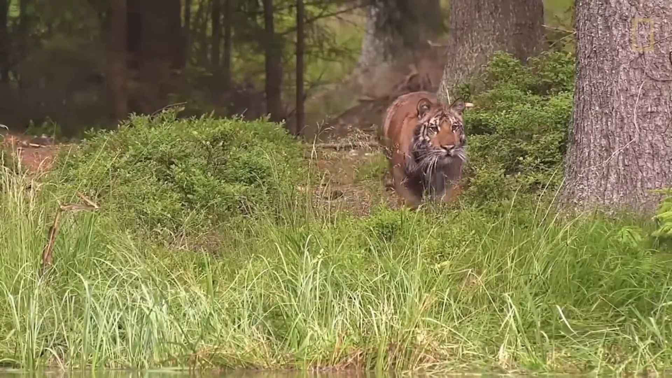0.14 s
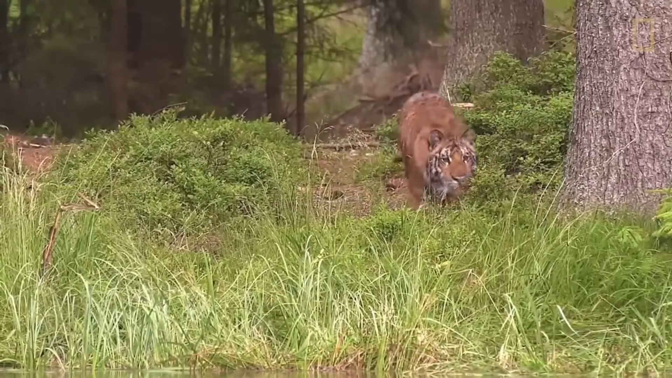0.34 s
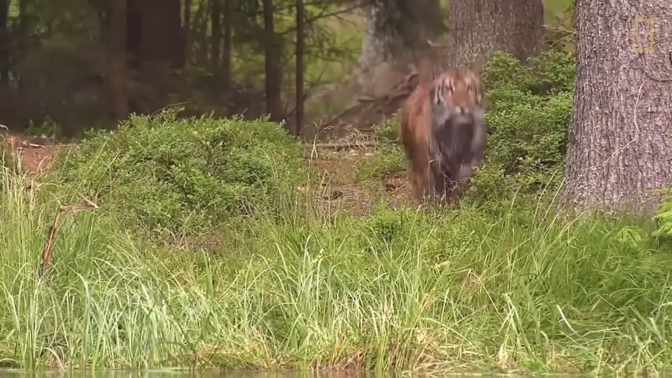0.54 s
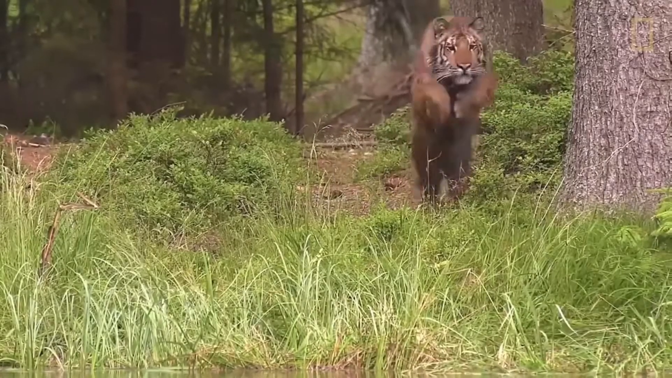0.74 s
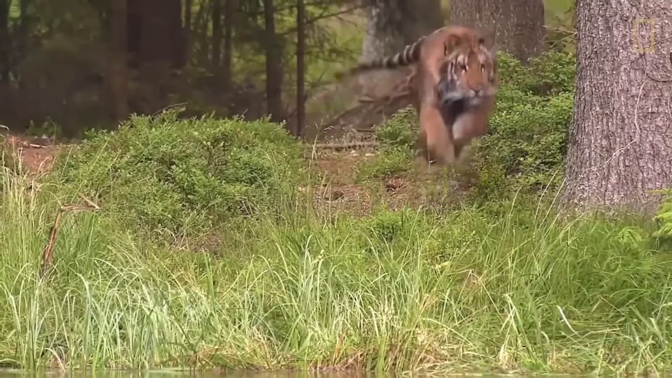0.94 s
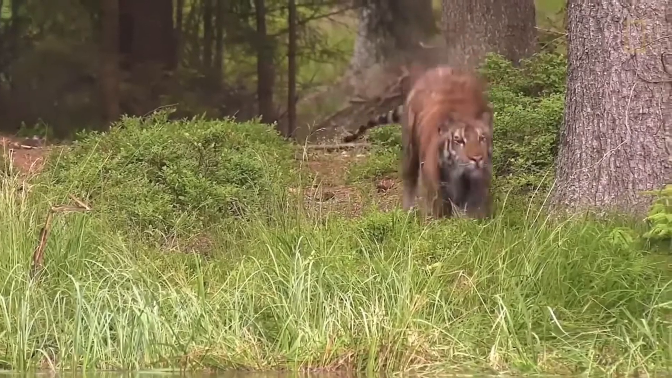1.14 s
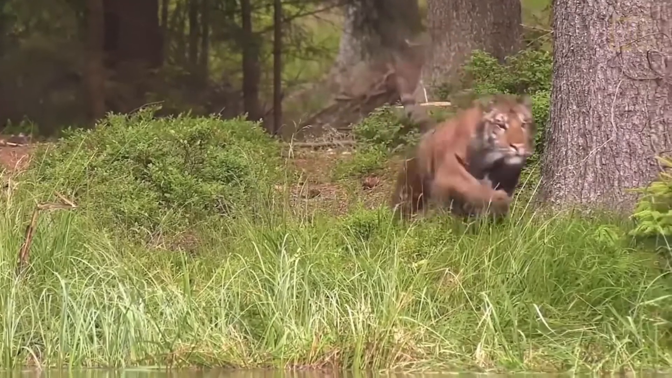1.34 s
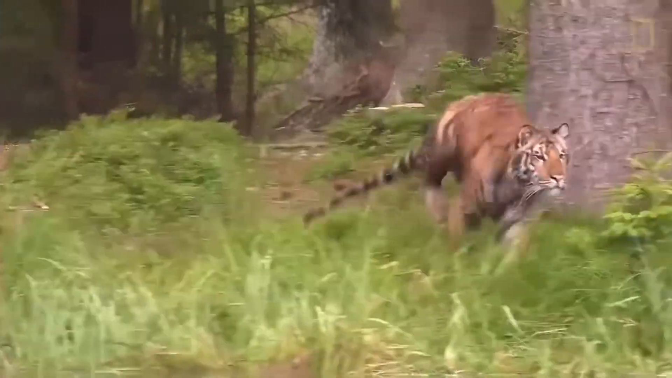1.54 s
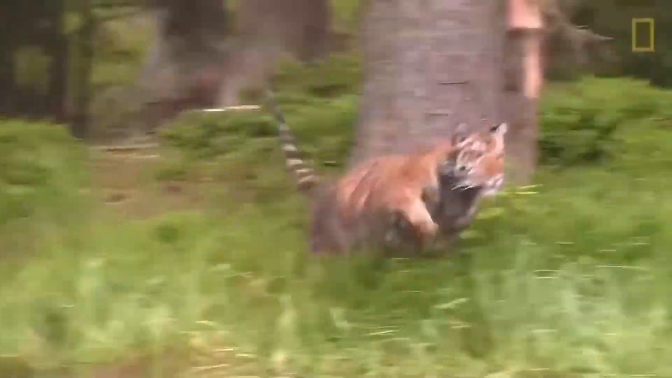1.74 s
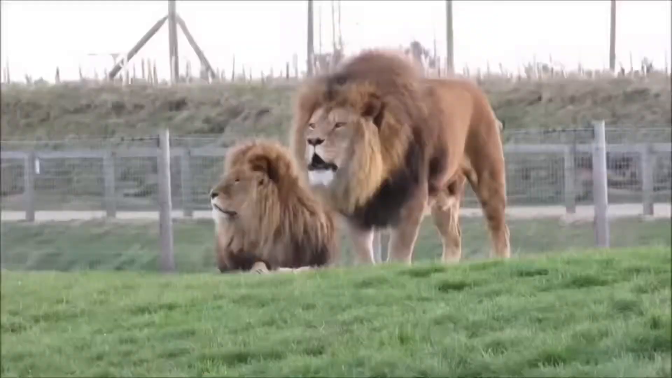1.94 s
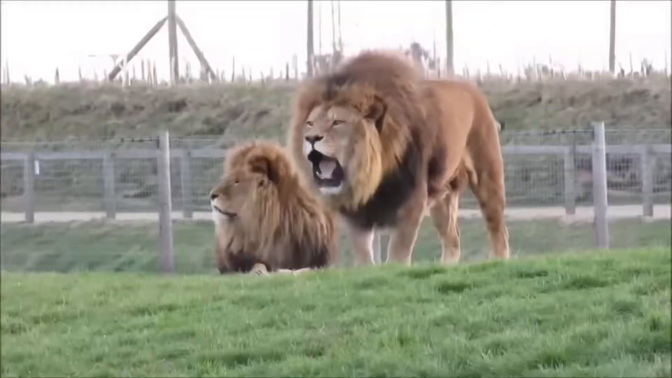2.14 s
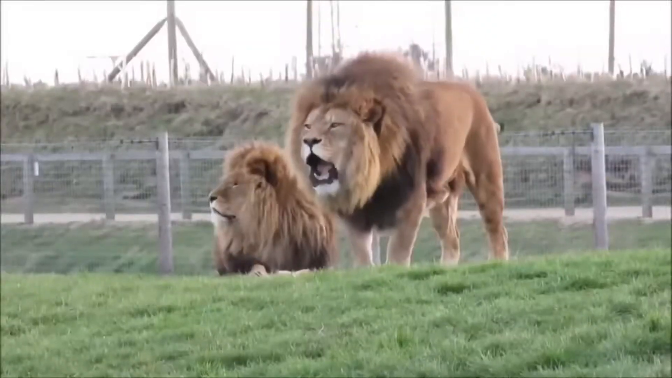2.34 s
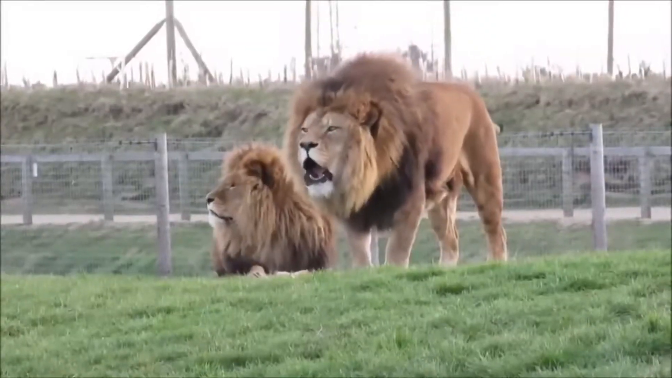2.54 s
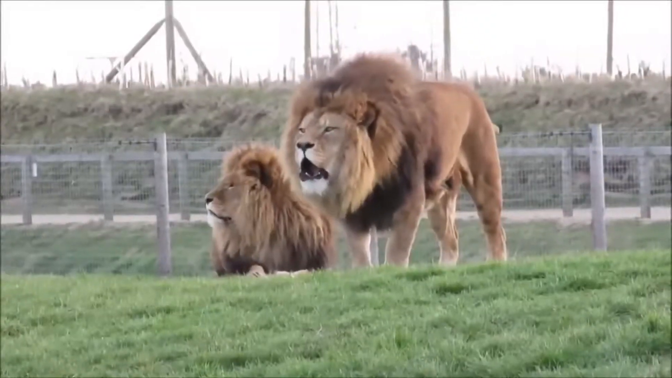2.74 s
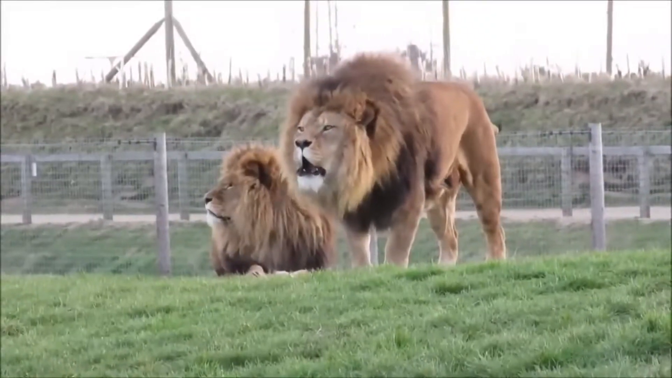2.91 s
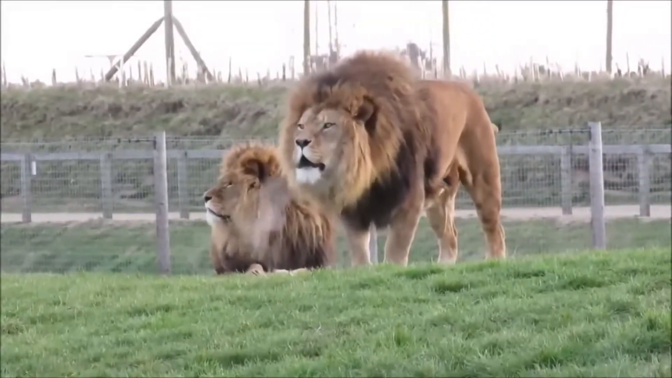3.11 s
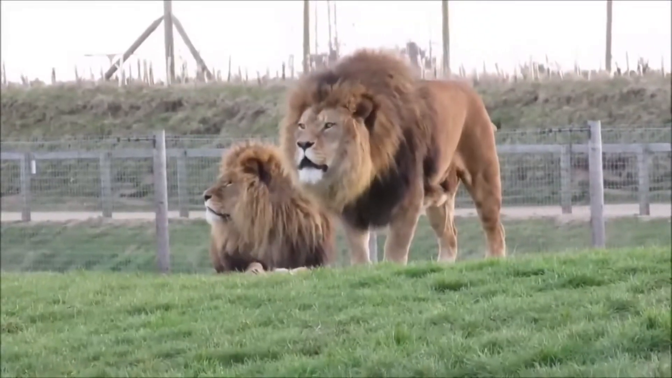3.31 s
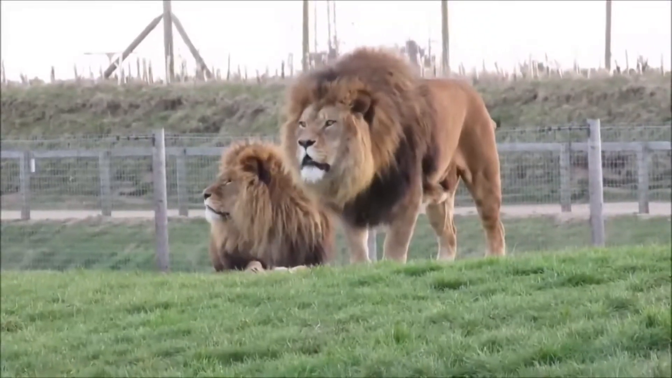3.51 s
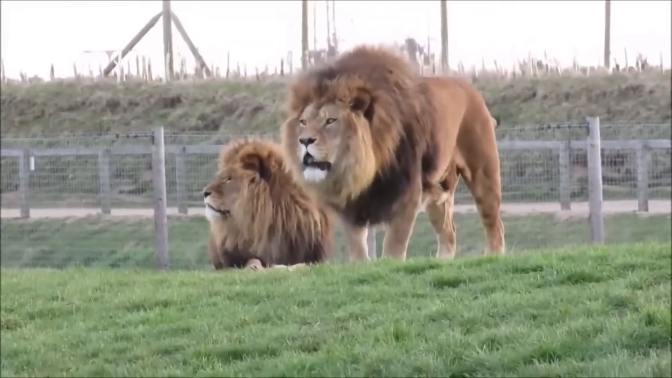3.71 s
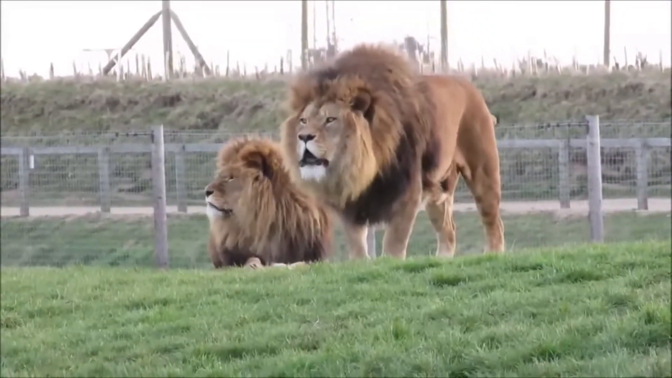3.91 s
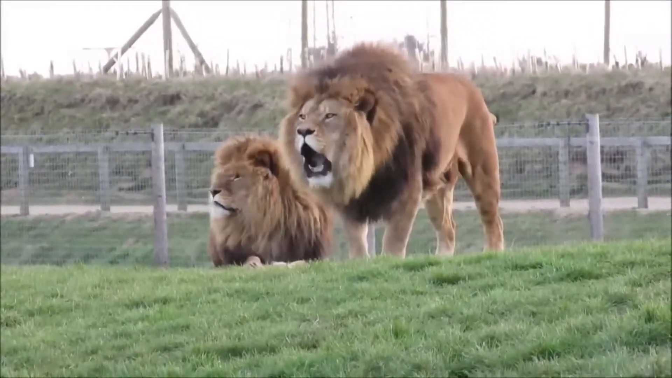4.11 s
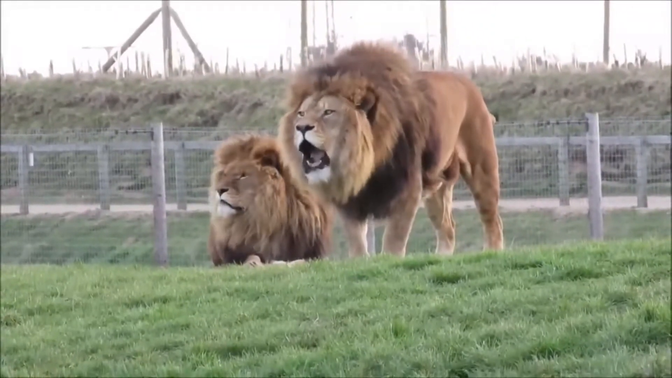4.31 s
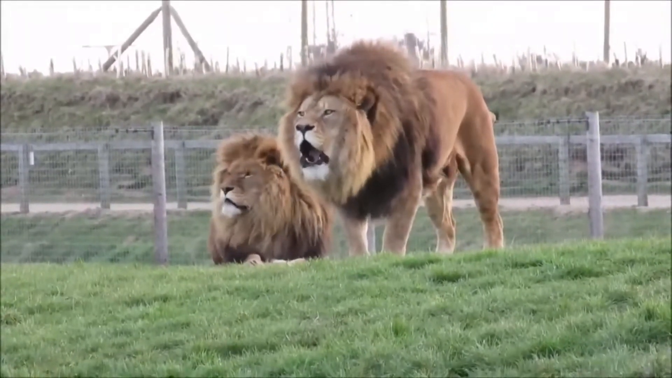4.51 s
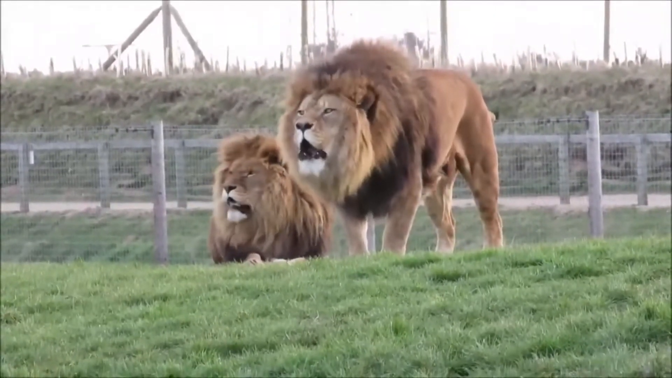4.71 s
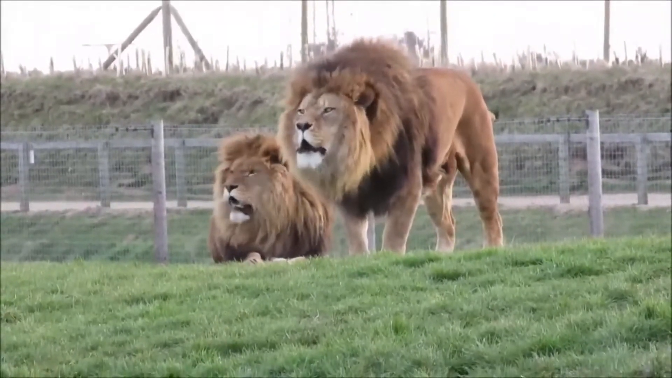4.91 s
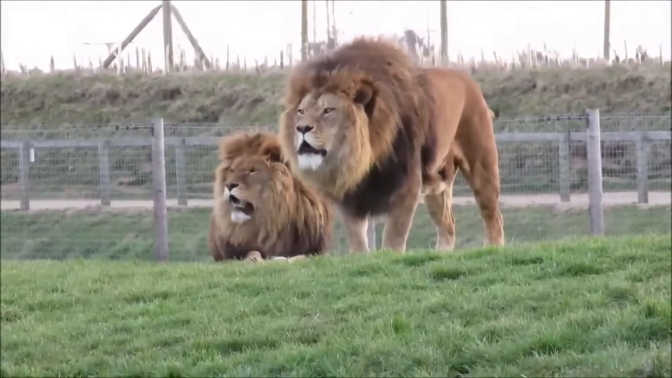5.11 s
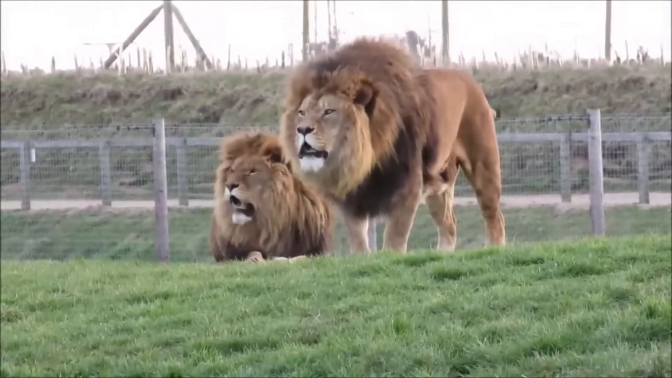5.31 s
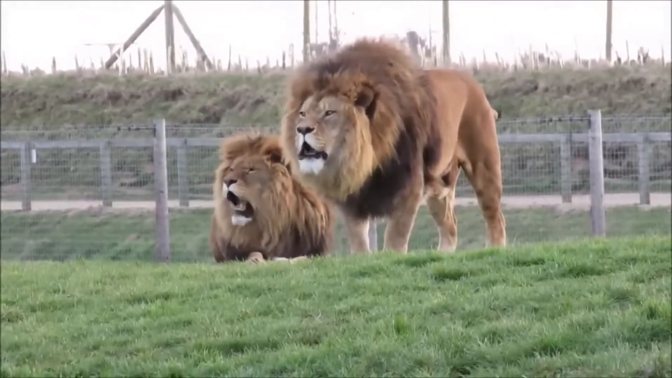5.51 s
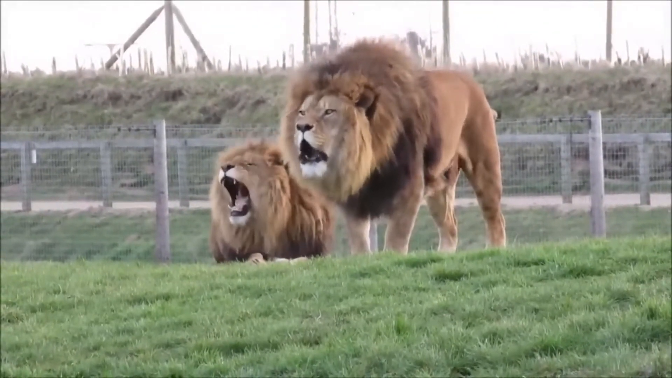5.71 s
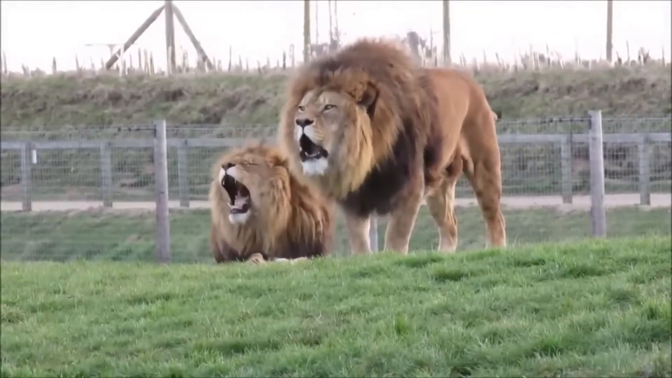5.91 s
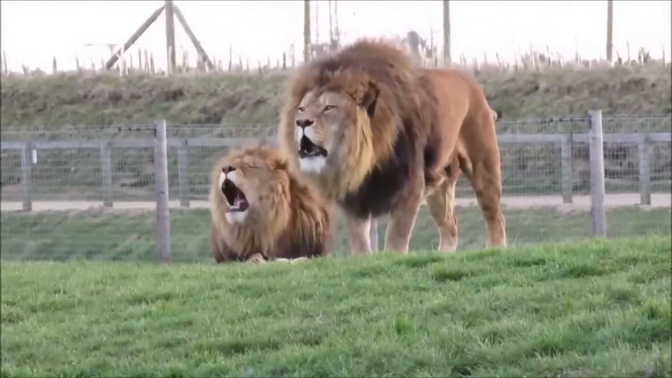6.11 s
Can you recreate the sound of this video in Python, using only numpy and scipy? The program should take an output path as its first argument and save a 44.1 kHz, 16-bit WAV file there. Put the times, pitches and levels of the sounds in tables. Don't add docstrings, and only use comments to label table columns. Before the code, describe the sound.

An open paddock with low, steady distant traffic hum and slight echoes from banks and fences. At 0 s a male lion close ahead is already roaring: hoarse, pulsing, climbing in pitch, with a small wheeze, rasping air and wet ticks, breaking at 0.8 s into a sagging grunt until about 1 s, then a faint pant. From 1 to 1.6 s soft low wind puffs hit the microphone and a faraway bird whistles gliding notes around 1.2-1.4 s. The second roar swells from 2.2 to 3.1 s, then grunts to 3.4 s. A second lion off to one side moans, throbbing most clearly at 3.3-4 s, and coughs until 4.25 s. The third, harsher roar runs 4.3-5 s with a grunt to 5.2 s and a pant. From 5.2 to 5.9 s wind flaps and rumbles in heavy low knocks. A strained fourth roar starts at 5.93 s and is cut off.

```python
import sys
import numpy as np
from scipy import signal
from scipy.fft import rfft, irfft
from scipy.io import wavfile
from scipy.ndimage import uniform_filter1d

SR = 44100
rng = np.random.default_rng(int(sys.argv[2]) if len(sys.argv) > 2 else 0)


def boost(x):
    u = np.asarray(x, float) / 20
    return 10 ** u


def generate_wav(sig):
    pcm = np.round(np.clip(np.atleast_2d(sig).T, -1, 1) * 32767).astype(np.int16)
    wavfile.write(sys.argv[1], SR, pcm)


N = 271215


def evened(x):
    return x / np.sqrt(np.mean(x ** 2) + 1e-20)


def steadied(x, size=3000):
    return x / np.sqrt(abs(uniform_filter1d(x ** 2, size)) + 1e-12)


def read(points, hz):
    f, value = np.transpose(points)
    return np.interp(np.log(hz + 1), np.log(f + 1), value)


def curve(rows, swing=1.0, pivot_db=-46.5):
    s, db = np.transpose(rows)
    return boost(np.interp(np.arange(N) / SR, s, pivot_db + swing * (db - pivot_db), -120, -120))


def timeline(rows):
    s, *columns = np.transpose(rows)
    t = np.linspace(s[0], s[-1], num=200)
    return t, *(np.interp(t, s, c) for c in columns)


def step(t, at, width=.06):
    return np.clip((t - at) / width + .5, 0, 1)


def add(mix, s, sound):
    part = mix[round(s * SR):][:len(sound)]
    part += sound[:len(part)]


def drift(count, hz):
    return evened(signal.lfilter(*signal.butter(2, hz, fs=SR), rng.standard_normal(count)))


def tone(hz):
    return np.sqrt(2) * np.sin(2 * np.pi * np.cumsum(hz) / SR)


def coloured(x, points):
    gain = boost(read(points, np.fft.rfftfreq(x.shape[-1], 1 / SR)))
    return evened(irfft(rfft(x) * gain, x.shape[-1]))


def resonate(x, hz, width):
    turn = np.exp(2j * np.pi * np.cumsum(hz * np.ones(len(x))) / SR)
    r = np.exp(-np.pi * width / SR)
    smooth = signal.lfilter([(1 - r) ** 2], np.convolve([1, -r], [1, -r]), x * turn.conj())
    return 2 * (turn * smooth).real


def ring(db, hz, cycles):
    u = np.arange(5000) / SR * hz / cycles
    return boost(db) * np.e * 2 * u * np.exp(-2 * u) * np.sin(2 * np.pi * u * cycles)


def patchwork(x, size_hz, size_s):
    return evened(uniform_filter1d(uniform_filter1d(x, size_hz, axis=0), size_s, axis=1))


# (starting chest resonance [Hz], fraying starts [s], fraying ends [s],
# strain [dB], grunt length [s], fraying [0-1], extra gape [0-1])
ROARS = [
    (290.3, 0.28, 0.5, 0.5, .205, .5, -.15),
    (289, 2.39, 2.8, 0.5, 0.32, .38, -0.2),
    (259.5, 4.34, 4.49, 2.5, .23, .42, 0.17),
    (198, 5.9, 6.16, 3.5, 0.28, .4, -.15),
]
# (time [s], pitch [Hz], effort [dB], mouth over chest [dB])
FIRST = [(0, 128.4, -36.5, 1.5), (0.11, 150.8, -23.5, -5), (.17, 138.4, -26.5, -6),
         (0.299, 142.1, -19.5, -5.5), (0.336, 164.3, -21, -2), (0.437, 175, -28, 6),
         (0.462, 160.2, -24.5, -4), (.51, 164.9, -24, -1), (0.534, 182.1, -29.5, 5),
         (0.709, 193.7, -17.5, -13), (.825, 196.6, -24, 3)]
SECOND = [(2.2, 140.9, -68, 11.5), (2.279, 145.1, -33.5, 4), (2.392, 164, -25, 0), (2.569, 165.9, -22, -6),
          (2.669, 181.1, -25, -1.5), (2.772, 186.2, -31.5, 6.5), (2.894, 196, -15.5, -16),
          (3.001, 193.4, -21, -4.5), (3.085, 195.8, -25.5, 1.5)]
THIRD = [(4.28, 188.6, -42, -1.5), (4.358, 194.2, -31, 6), (4.45, 191.4, -24.5, -2),
         (4.51, 171.9, -20.5, -5), (4.57, 176.8, -27, -1), (4.681, 186.2, -25.5, -1.5),
         (4.792, 193.4, -16, -16.5), (4.9, 192.8, -22.5, -2), (4.965, 185, -25, 3.5)]
FOURTH = [(5.93, 167, -50, -25), (5.954, 163.8, -38, 8.5), (6.018, 172.5, -30.5, 2.5), (6.15, 183, -34, 4),
          (6.7, 188, -37, 9)]


def roars():
    out = np.zeros(N)
    for rows, habits in zip((FIRST, SECOND, THIRD, FOURTH), ROARS):
        add(out, *roar(rows, *habits))
        strain_db, length = habits[3], habits[4]
        if rows[-1][0] < N / SR:
            add(out, *grunt(rows[-1][0], length, strain_db))
    return out


# (time from the break [s], larynx drop [0-1], gape [0-1])
DESCENT = [(-.6, 0.03, 0.31), (-.42, 0.1, 0.38), (-.3, 0.35, .65), (-.2, 1, 0.83), (-.1, .97, 0.59),
           (0, 0.95, 0.11)]
LOW_CHEST_HZ = 204.4
SMOOTH, TIRED, TIRE_S = .11, .31, .1
EVEN, UNEVEN, SPENT = .07, .75, .3
WEAR_S, EXHALE_S = 0.66, 0.19


def roar(rows, chest_hz, fray_from, fray_to, strain_db, length, fraying, extra_gape):
    t, hz, effort_db, open_db = timeline(rows)
    before, drop, gape = np.transpose(DESCENT)
    left = (t - t[-1]) * (0.16 / length) ** 0.5
    drop = np.interp(left, before, drop)
    gape = np.interp(left, before, gape) + extra_gape * (1 - step(t, fray_to))
    frayed = step(t, fray_from) - step(t, fray_to)
    tired = step(t, t[-1] - TIRE_S)
    rough = SMOOTH + (fraying - SMOOTH) * frayed + (TIRED - SMOOTH) * tired
    beating = step(t, (fray_from + fray_to) / 2, fray_to - fray_from + 0.022)
    alternate = EVEN + (UNEVEN - EVEN) * beating - (UNEVEN - SPENT) * tired
    chest_hz = chest_hz + (LOW_CHEST_HZ - chest_hz) * drop
    age = np.minimum(t - t[0], WEAR_S)
    return near_breath(t, hz, effort_db, open_db, chest_hz, gape, rough, alternate, strain_db, age)


# (share of its length [0-1], pitch [Hz], effort [dB], mouth over chest [dB])
GRUNT = [(0, 178, -33, 8.5), (.12, 166.7, -26, 0), (.3, 149.2, -22.5, -6.5), (.48, 139.9, -28.5, -4.5),
         (.58, 133, -33.5, -9.5), (.8, 130.1, -40, -8.5), (1, 125.8, -57, -13)]
GRUNT_CHEST_HZ, GRUNT_DIP_HZ, GRUNT_GAPE, GRUNT_ROUGH = 188, 30.8, 0.3, 0.3


def grunt(start, length, strain_db):
    u, hz, effort_db, open_db = timeline(GRUNT)
    dip = np.clip(np.minimum(u / 0.33, (1 - u) / 0.58), 0, 1)
    chest_hz = GRUNT_CHEST_HZ - GRUNT_DIP_HZ * dip
    gape = GRUNT_GAPE * np.clip(1 - u / 0.58, 0, 1) + 0.18 * np.clip(u - .3, 0, 1)
    rough, alternate = GRUNT_ROUGH + 0 * u, SPENT + 0 * u
    age = WEAR_S + EXHALE_S * u
    return near_breath(start + u * length, hz, effort_db, open_db, chest_hz, gape, rough, alternate,
                       strain_db, age)


# (throat short [Hz], throat stretched [Hz], width [Hz], level [dB])
THROAT = [(1142, 990, 270, 5), (1480, 1277, 170, 3.5), (1830, 1704, 220, 3.5), (2260, 2100, 116, 4),
          (2714, 2380, 130, -2.5)]
SINUS = [(3700, 3100, 140, 5), (4140, 3650, 200, -1), (4870, 4350, 160, -3.5), (5840, 5100, 550, -17),
         (7500, 9100, 170, -15)]
# (frequency [Hz], level [dB per Hz])
HISS = [(2200, -4.5), (2850, -14), (3300, -8), (4200, -10), (5000, -18), (6000, -23), (10000, -25.5),
        (12500, -33.5), (14500, -53)]
# (time [s], frequency [Hz], level over the rasp [dB])
TONGUE = [(.3, 1600, -10), (.4, 1315, -3), (.55, 1620, -14.5), (.63, 1480, -1), (.75, 1705, -11),
          (.8, 1405, -11), (.84, 1150, 5.5), (.95, 1127, -2.5), (2.45, 1145, -3), (2.78, 1482, -8.5),
          (3.16, 1160, 1), (4.36, 1280, 0.5), (4.44, 1526, 2), (4.6, 1436, 6.5), (4.72, 1340, -1),
          (4.85, 1250, -19.5), (4.98, 1066, -1), (5.95, 1270, 2), (6.03, 1323, 1), (6.15, 1370, 4.5)]
MOUTH_HZ, MOUTH_GAPE_HZ = 400.6, 66
RASP_DB, RASP_OPEN, RASP_SINK_DB = -22, 0.66, 6
AIR_DB, AIR_OPEN, AIR_SINK_DB, AIR_DB_PER_S = -38, 0.73, 7, 13.5


def near_breath(t, hz, effort_db, open_db, chest_hz, gape, rough, alternate, strain_db, age):
    sink = np.clip((260 - chest_hz) / 69, 0, 1)
    rasp_db = RASP_DB + strain_db + RASP_OPEN * open_db + RASP_SINK_DB * sink
    air_db = AIR_DB + 2.1 * strain_db + AIR_OPEN * open_db + AIR_SINK_DB * sink + AIR_DB_PER_S * age
    mouth_hz = MOUTH_HZ + MOUTH_GAPE_HZ * gape
    rows = np.transpose([t, effort_db, chest_hz, mouth_hz, open_db, gape, rasp_db, air_db])
    folds = np.transpose([t, rough, alternate])
    return breath(rows, np.transpose([t, hz]), folds, THROAT, SINUS, HISS, chest_width=60.4,
                  mouth_width=107.0, throb_db=-1.5, short_hz=264.0, tongue=TONGUE)


# (time [s], pitch [Hz], effort [dB], mouth over chest [dB])
MOAN = [(2.36, 273, -43.5, 12), (2.45, 273.4, -44.5, 12), (3.2, 259.3, -44.5, 12.5),
        (3.33, 251.6, -42.5, 9.5), (3.39, 256.9, -45.5, 10), (3.52, 278.2, -45, 10.5),
        (3.62, 285, -36, 6.5), (3.74, 289, -43.5, 12.5), (3.81, 289, -41.5, 16.5), (3.902, 278, -36.5, 12),
        (3.975, 257.7, -38, 12)]
COUGH = [(3.975, 248.1, -36.5, 9), (4.0, 210.9, -31.5, -8), (4.048, 207.1, -22.5, -14.5),
         (4.1, 201.5, -32.5, -10), (4.146, 238.8, -42, 11), (4.26, 243.5, -45.5, -4.5)]
MOAN_AIR_DB, COUGH_AIR_DB = -28, -19
MOAN_CLEARS_S, COUGH_FRAYS_S = 3.785, 4.105


def answer():
    out = np.zeros(N)
    add(out, *moan(MOAN, MOAN_AIR_DB, MOAN_CLEARS_S, rough_from=.5, rough_to=.2, throb_db=1.8))
    add(out, *moan(COUGH, COUGH_AIR_DB, COUGH_FRAYS_S, rough_from=.1, rough_to=.6, throb_db=2.))
    return out


# (throat short [Hz], throat stretched [Hz], width [Hz], level [dB])
MOAN_THROAT = [(1380, 1313, 290, 2), (1719, 1794, 170, -2.5), (2100, 1980, 480, -11), (2637, 2520, 230, -9)]
MOAN_SINUS = [(3150, 3100, 230, -2.5)]
# (frequency [Hz], level [dB per Hz])
MOAN_HISS = [(2900, -16), (3260, 0), (3550, -19), (3810, -11.5), (4500, -19.5), (6000, -23), (7000, -39),
             (9000, -51), (12000, -63)]
MOAN_RASP_DB, MOAN_AIR_OPEN = -6, 0.87


def moan(rows, air_db, turn_s, rough_from, rough_to, throb_db):
    t, hz, effort_db, open_db = timeline(rows)
    rough = rough_from + (rough_to - rough_from) * step(t, turn_s)
    chest_hz = 232 + (0.81 * hz - 232) * step(t, MOAN_CLEARS_S)
    mouth_hz = np.clip(2 * hz, 525, 590)
    gape = 0.02 + 0 * t
    rasp_db = MOAN_RASP_DB + RASP_OPEN * open_db
    hiss_db = air_db + MOAN_AIR_OPEN * open_db
    rows = np.transpose([t, effort_db, chest_hz, mouth_hz, open_db, gape, rasp_db, hiss_db])
    folds = np.transpose([t, rough, .6 * rough])
    return breath(rows, np.transpose([t, hz]), folds, MOAN_THROAT, MOAN_SINUS, MOAN_HISS,
                  chest_width=130., mouth_width=105., throb_db=throb_db, short_hz=260.)


def breath(rows, pitch, folds, throat, sinus, air, chest_width, mouth_width, throb_db, short_hz, tongue=None):
    s, *columns = np.transpose(rows)
    t = np.arange(s[0] - .012, min(s[-1] + 0.014, N / SR + 0.043), 1 / SR)
    count = len(t)
    effort_db, chest_hz, mouth_hz, mouth_db, gape, rasp_db, hiss_db = (np.interp(t, s, c) for c in columns)
    at, *columns = np.transpose(folds)
    rough, alternate = (np.interp(t, at, c) for c in columns)

    hz = np.interp(t, *np.transpose(pitch)) * (1 + .11 * rough * drift(count, 60.))
    pairs = np.cumsum(hz) / SR / 2
    pulses, puffs = fold_pulses(pairs, rough, alternate)
    throb_db = throbbing(t, rough, throb_db)
    low = pulses + (0.22 + 2.67 * rough) * puffs
    high = pulses + (.15 + .8 * rough if tongue else .9) * puffs
    slap = 1 if tongue else slaps(t)

    chest = steadied(resonate(low, chest_hz, chest_width))
    if tongue:
        chest = chest + second_edge(t)
    chest = steadied(chest, size=600)

    mouth = mouth_ring(low, puffs, rough, mouth_hz, mouth_width, gape)
    if not tongue:
        mouth = (mouth + 0.16 * steadied(resonate(puffs, 765., 150.0))) * slap ** 0.4

    stretch = np.clip((short_hz - chest_hz) / 59.0, 0, 1.2)
    rasp = tract(high, throat, stretch)
    if tongue:
        rasp = rasp + tongue_ring(t, high + 1.2 * rough * puffs, tongue)

    air_noise = coloured(puffs + 0.5 * rng.standard_normal(count), air)
    hiss = steadied((.9 + .5 * stretch) * air_noise + tract(high + .3 * puffs, sinus, stretch))
    hiss = torn(hiss, patchy_db=2.)
    hiss_db = hiss_db + 0.95 * np.tanh(drift(count, 10.0))
    beat_db = 2.5 * alternate * (1.0 - pairs % 1) + 1.6 * (-0.5 - 2 * pairs % 1)
    upper = boost(rasp_db) * rasp + boost(hiss_db) * hiss * boost(beat_db)
    voice = chest - boost(mouth_db) * mouth + upper * slap * boost(-throb_db / 3)
    fade = np.clip(np.minimum(t - t[0], t[-1] - t) / .024, 0, 1)
    skip = max(round(-t[0] * SR), 0)
    return max(t[0], 0), (boost(effort_db + throb_db) * voice * np.sqrt(fade))[skip:]


def fold_pulses(pairs, rough, alternate):
    count = len(pairs)
    order = np.arange(2, 71)[:, None]
    weight = np.where(order % 2, alternate, 1)
    clean = (weight * np.cos(2 * np.pi * order * pairs)).sum(0)
    gate = np.exp(-(2 * pairs % 1)) * (1 + alternate * np.sign(pairs % 1 - .5))
    gate = gate * boost(2.75 * drift(count, 73.0))
    puffs = steadied((0.67 + gate) * rng.standard_normal(count))
    return steadied(clean) * boost(2.3 * rough * drift(count, 70.)), puffs


# (time [s], depth [dB], length [s])
CATCHES = [(.328, 9, .012), (.348, 8, .008), (.379, 10, .008), (.747, 14, .012), (.839, 14, .014),
           (3.088, 7, .008), (4.976, 11, .01), (2.944, 17, .014), (2.989, 11, .01), (3.045, 6, .01),
           (3.585, 10, .014), (3.675, 9, .012), (3.874, 17, .009), (4.48, 10, .008), (4.513, 9, .008),
           (4.753, 9, .008), (4.794, 7, .006), (4.862, 10, .016), (4.882, 7, .006), (4.915, 5, .01),
           (5.957, 9, .008), (6.106, 10, .008)]


def throbbing(t, rough, depth_db):
    flutter = np.cos(2 * np.pi * np.cumsum(87.0 + 1.8 * drift(len(t), 2.4)) / SR)
    level_db = depth_db * rough * (flutter + 0.99 * np.tanh(drift(len(t), 48.0)))
    for at, db, length in CATCHES:
        if t[0] < at < t[-1] + .03:
            sides = np.where(t < at, length, .002)
            level_db = level_db - db * np.exp(-abs(t - at) / sides)
    return uniform_filter1d(level_db, size=90)


# (time [s], pitch [Hz], level over the chest [dB])
SECOND_EDGE = [(.42, 200, -28), (.45, 240, -1.5), (.51, 240.6, 5.5), (.54, 248, -33.5), (2.36, 290, -30),
               (2.39, 286.1, 1.5), (2.43, 292.8, -9.5), (2.5, 292.1, 0.5), (2.58, 296.9, -1.5),
               (2.63, 268.5, 3), (2.69, 251, 0.5), (2.77, 239.5, -3.5), (2.81, 240, -28.5)]


def second_edge(t):
    at, hz, db = np.transpose(SECOND_EDGE)
    return boost(np.interp(t, at, db, -60, -60)) * tone(np.interp(t, at, hz))


def mouth_ring(low, puffs, rough, mouth_hz, mouth_width, gape):
    gape = np.clip(gape, 0, 1)
    mouth = (1 - gape) * resonate(low + 0.89 * rough * puffs, mouth_hz, mouth_width)
    mouth = mouth - gape * resonate(low, 680.0 - 43.0 * rough, 110.0)
    mouth = mouth + 0.28 * resonate(low, 566.0, 380.0)
    narrow_rough = np.clip(.7 - gape, 0, 1) * np.clip(rough - TIRED, 0, 1)
    mouth = mouth + 7.0 * narrow_rough * resonate(low, 583.4, 83.0)
    return steadied(signal.lfilter(*signal.butter(4, 760., fs=SR), mouth))


def tongue_ring(t, x, tongue):
    at, hz, db = np.transpose(tongue)
    hz = np.interp(t, at, hz) * (1 + .03 * drift(len(t), 25.))
    level = boost(np.interp(t, at, db)) * boost(1.5 * drift(len(t), 20.))
    return level * steadied(resonate(x, hz, 170.))


def tract(x, modes, stretch):
    out = 0
    for k, (short, long, width, db) in enumerate(modes):
        level = (-1) ** k * boost(db + 4.3 * drift(len(x), 17.4))
        hz = (short + (long - short) * stretch) * (1 + 0.021 * drift(len(x), 15.0))
        out = out + level * resonate(x, hz, width)
    return steadied(out)


def torn(x, patchy_db):
    z = signal.stft(x, nperseg=256)[2]
    patches = patchwork(rng.standard_normal(z.shape), 5, 12)
    return signal.istft(z * boost(patchy_db * patches), nperseg=256)[1][:len(x)]


# (time [s], strength [dB])
THROBS = [(3.286, -1), (3.326, -3), (3.364, 0), (3.397, -2), (3.423, -1), (3.453, 1), (3.478, 3.5),
          (3.505, 3.5), (3.547, 1), (3.584, 0), (3.627, -3.5), (3.672, 5.5), (3.712, -1.5), (3.752, -2),
          (3.789, -0.5), (3.825, -0.5), (3.857, 1), (3.887, -4.5), (3.914, -1.5), (3.946, -8), (3.986, -1),
          (4.011, -5.5), (4.075, 0.5), (4.132, 2.5), (4.166, 1)]


def slaps(t):
    at, db = np.transpose(THROBS)
    u = np.maximum(t - at[:, None], 0) / .007
    return .4 + (boost(db)[:, None] * u * np.exp(1 - u)).sum(0) * .8


# (time [s], peak level [dB], pitch [Hz])
TICK = [(0.074, -31.5, 1560), (0.077, -36, 1226), (0.4535, -35.5, 1227), (4.4128, -28, 1480),
        (4.439, -26.5, 1489), (4.4814, -27.5, 1560), (4.515, -37.5, 1550), (5.2393, -60, 3700),
        (5.264, -53, 3400), (6.017, -29.5, 1314)]


def jaw_clicks():
    out = np.zeros(N)
    for s, db, hz in TICK:
        click = ring(db, hz, cycles=5.0) + ring(db - 9, 1.4 * hz, cycles=5.)
        click = click + ring(db - 26, 2.5 * hz, cycles=6.) + ring(db - 33, 3.5 * hz, cycles=7.)
        add(out, s, click)
    return out


# (time [s], peak level [dB], pitch [Hz])
SPIT = [(.455, -52, 4020), (.456, -52.5, 5340), (.456, -57, 5960), (.488, -51, 3850), (.512, -53, 3918),
        (.513, -55.5, 5770), (.535, -61, 5620), (.64, -61, 5260), (.752, -57.5, 5600), (5.96, -68, 8800),
        (5.982, -57, 7300), (5.992, -67, 7300), (6.018, -56, 7100), (6.019, -60, 8600),
        (6.019, -66.5, 12200), (6.019, -51, 4900), (6.03, -59, 6900), (6.066, -43, 3400),
        (6.066, -65, 7200), (6.077, -62, 7200), (6.077, -66, 12000), (6.098, -50, 3200), (6.11, -58, 7200),
        (6.121, -61, 8500), (6.122, -65, 11200), (6.14, -64, 9500)]


def spit():
    out = np.zeros(N)
    for s, db, hz in SPIT:
        add(out, s, ring(db, hz, cycles=hz * 0.0043))
    return out


# (middle time [s], length [s], level [dB])
PANTS = [
    (.96, 0.088, -54),
    (3.305, 0.11, -55),
    (4.156, 0.048, -45),
    (5.128, .06, -48),
]


def pants():
    out = np.zeros(N)
    for s, length, db in PANTS:
        air = rng.standard_normal(round(2 * length * SR))
        sound = tract(air, THROAT, 0.93) + 0.27 * tract(air, SINUS[:3], 0.98)
        add(out, s - length, boost(db) * np.hanning(len(air)) * sound)
    return out


# (start time [s], end time [s], start pitch
# [Hz], middle pitch [Hz], end pitch [Hz], level [dB])
OPENING_GLIDES = [
    (.04, .14, 1500, 1870, 1980, -52),
    (.12, .34, 1980, 1820, 1540, -53),
    (0, .19, 190, 184, 180, -42),
    (.22, .46, 172, 170, 178, -42),
]


def opening_glides():
    return whistles(OPENING_GLIDES)


def whistles(rows):
    out = np.zeros(N)
    for start, end, start_hz, middle_hz, end_hz, db in rows:
        u = np.linspace(0, 1, round((end - start) * SR))
        hz = np.polyval(np.polyfit([0, .4, 1], [start_hz, middle_hz, end_hz], 2), u)
        shape = signal.windows.tukey(len(u), .5) * boost(0.69 * drift(len(u), 56.0))
        add(out, start, boost(db) * tone(hz) * shape)
    return out


def paddock(x, t60):
    t = np.arange(SR) / SR
    taps = rng.standard_normal(SR) * (rng.random(SR) < .05) * boost(-60 * t / t60) * (t > .012)
    taps = signal.lfilter([1], [1, -.6], taps)
    return signal.fftconvolve(x, taps / np.linalg.norm(taps))[:N]


# (time [s], level [dB])
WIND = [(0, -63), (.3, -63), (.45, -46.5), (1.04, -46), (1.16, -55), (1.24, -47.5), (1.33, -60),
        (2.05, -68.5), (2.33, -63), (2.42, -46.5), (2.55, -54), (3.0, -45.5), (3.5, -40.5), (3.98, -37),
        (4.07, -66), (4.26, -39.5), (5.75, -43), (6.15, -55.5)]
# (frequency [Hz], level [dB per Hz])
GUST_COLOUR = [(8.8, -72.5), (15, -50.5), (82, -2.5), (166, -4), (200, -1.5), (260, -31.5), (440, -120)]
# (time [s], peak level [dB], pitch [Hz])
THUDS = [
    (1.047, -32, 102.2),
    (1.239, -30, 109),
    (1.558, -37, 153),
]


def wind():
    both, left, right = coloured(rng.standard_normal((3, N)) * boost(3.3 * drift(N, 26.0)), GUST_COLOUR)
    puffs = np.zeros(N)
    for s, db, hz in THUDS:
        add(puffs, s, ring(db, hz, cycles=0.77))
    gust = 0.86 * both + 0.23 * np.array([left - right, right - left]) * boost([[1.], [-1.]])
    steady = gust / np.sqrt(uniform_filter1d(gust.mean(0) ** 2, 12000) + 1e-9)
    return curve(WIND, swing=1.3) * boost(1.5) * steady + puffs


# (time [s], peak level [dB], ring pitch [Hz])
FLAPS = [(5.242, -49, 152), (5.308, -25, 193), (5.323, -16, 213), (5.388, -21, 160), (5.452, -16, 147.6),
         (5.498, -17.5, 230), (5.539, -13, 327), (5.647, -37, 160), (5.728, -25.5, 249),
         (5.779, -14.5, 280), (5.851, -24, 170), (5.875, -15, 309)]
# (time [s], level [dB])
BUFFET = [(5.05, -68), (5.15, -39.5), (5.55, -30), (5.97, -30), (6.03, -35)]
# (frequency [Hz], level [dB per Hz])
BUFFET_COLOUR = [(53, -30.5), (90, -13.5), (161, 2.5), (289, -3), (433, -9), (484, -9.5), (523, -25.5),
                 (560, -40), (700, -43.5), (910, -46), (1540, -120)]


def rumble():
    lumpy = rng.standard_normal(N) * boost(5.4 * drift(N, 28.0))
    return steadied(coloured(lumpy, BUFFET_COLOUR), 8000)


def buffets():
    both = np.zeros(N)
    for s, db, hz in FLAPS:
        add(both, s, ring(db - 7.5, hz, cycles=2.14) + ring(db - 15.5, 379.0, cycles=4.0))
    both = both + boost(-4.5) * curve(BUFFET) * rumble()
    return both + curve(WIND) * boost(6.0) * rumble() * [[1], [-1]]


# (start time [s], end time [s], start pitch [Hz], middle pitch [Hz], end pitch [Hz], level [dB])
BIRD = [
    (1.185, 1.28, 1750, 1785, 1820, -66),
    (1.265, 1.37, 1865, 1870, 1740, -64.5),
    (1.17, 1.222, 2400, 2620, 2750, -73),
    (1.208, 1.245, 2780, 2500, 2050, -70),
    (1.25, 1.285, 2730, 2750, 2760, -75),
    (1.335, 1.425, 2780, 2380, 1850, -66),
]


def bird():
    return whistles(BIRD)


# (frequency [Hz], level [dB per Hz])
HUM = [(20, -14.5), (54, -8.5), (120, -11), (185, -2.5), (280, -6), (550, -9.5), (920, -6.5), (1230, -15),
       (1620, -21), (2180, -32), (3050, -37), (5000, -43.5), (8000, -48), (10500, -51), (13000, -79),
       (15000, -102.5)]
# (frequency [Hz], likeness [-1 to 1])
SAME = [(60, 0.88), (130, 1), (270, 1), (580, 0.72), (1220, 0.88), (2600, 0.078)]
HUM_DB = -45.5


def hum():
    hz = np.fft.rfftfreq(1024, 1 / SR)
    a, b, c, d, patches = rng.standard_normal((N // 256 + 5, 513, 5)).T
    patches = patchwork(patches, 8, 14)
    same = np.clip(read(SAME, hz), -1, 1)[:, None]
    left = a + 1j * b
    right = same * left + np.sqrt(1 - same ** 2) * (c + 1j * d)
    z = np.array([left, right]) * boost(read(HUM, hz)[:, None] + 1.1 * patches)
    return boost(HUM_DB) * evened(signal.istft(z, nperseg=1024, noverlap=768)[1][:, :N])


def scene():
    near = roars() + jaw_clicks() + spit() + pants()
    far = answer()
    far_echoed = far + paddock(far, t60=.5) * boost(-12.5)
    aside = boost(-9.0) * signal.hilbert(far_echoed).imag * [[1], [-1]]
    treble = signal.lfilter(*signal.butter(2, 1800., 'high', fs=SR), near)
    aside = aside + boost(-17.0) * np.roll(treble, shift=310) * [[1], [-1]]
    echoes = boost(-12.0) * paddock(near + far, t60=0.43)
    return near + far + aside + opening_glides() + echoes + wind() + buffets() + bird() + hum()


def band_limit(x):
    return signal.sosfilt(signal.butter(12, 14200, fs=SR, output="sos"), x)


def record(dry):
    middle_side = np.array([dry[0] + dry[1], dry[0] - dry[1]]) / 2
    mid, side = signal.stft(middle_side, nperseg=2048)[2]
    mid_power, side_power = (uniform_filter1d(uniform_filter1d(abs(z) ** 2, size=9, axis=0), 3, 1)
                             for z in (mid, side))
    heard = side_power > mid_power * boost(-2 * 16.)
    kept = signal.istft(side * heard, nperseg=2048)[1][:N]
    mix = dry.mean(0) + kept * [[1], [-1]]
    return band_limit(mix)


dry = scene()
out = record(dry)
generate_wav(out)
```